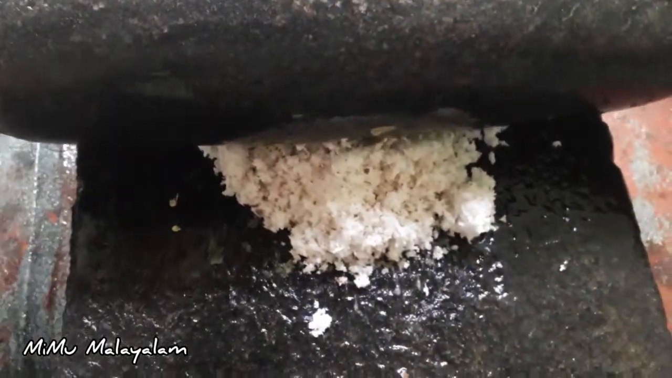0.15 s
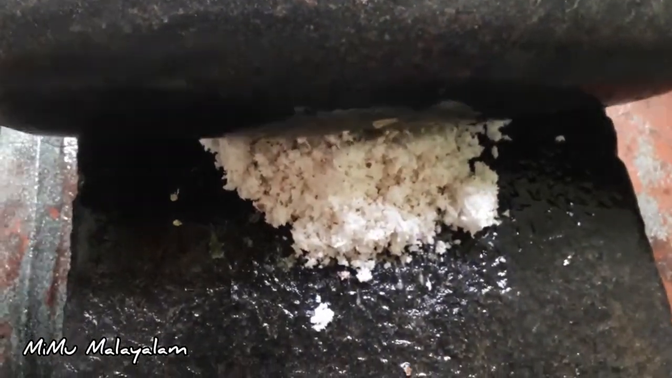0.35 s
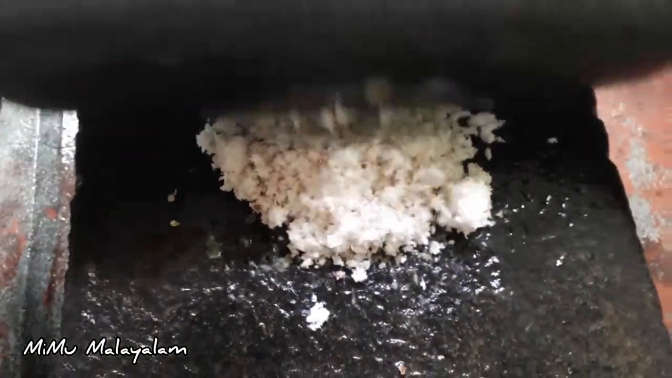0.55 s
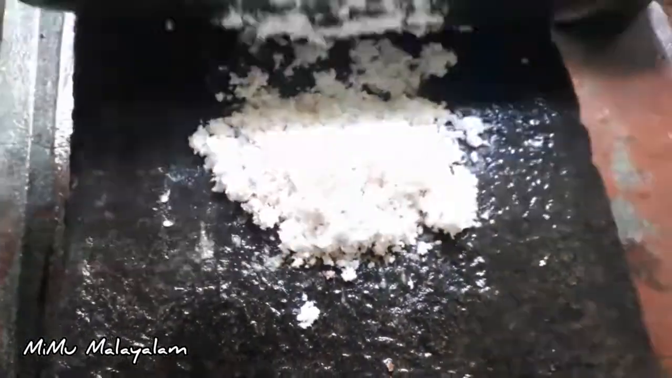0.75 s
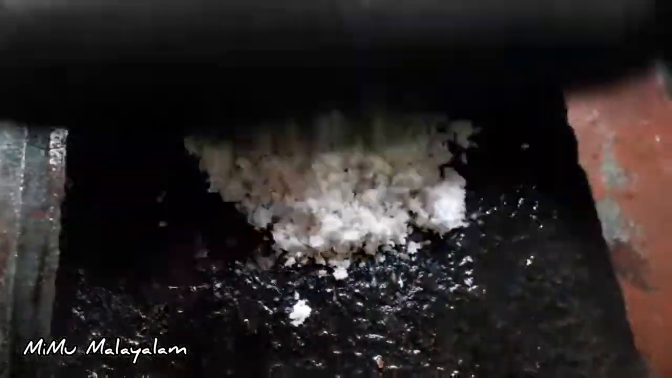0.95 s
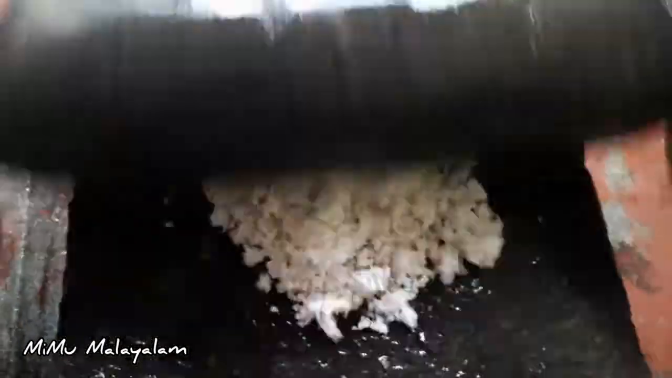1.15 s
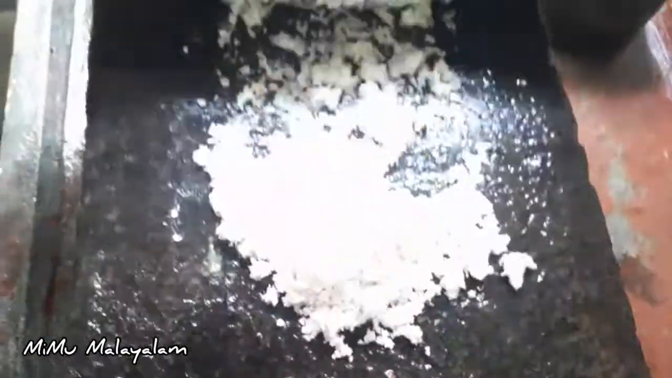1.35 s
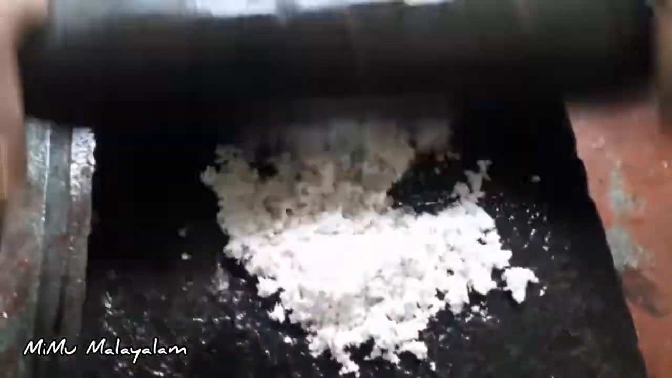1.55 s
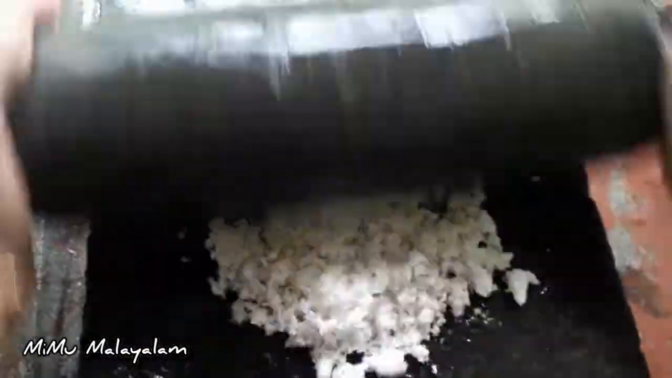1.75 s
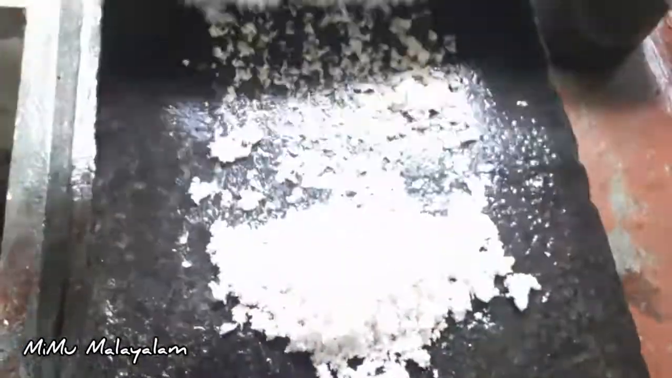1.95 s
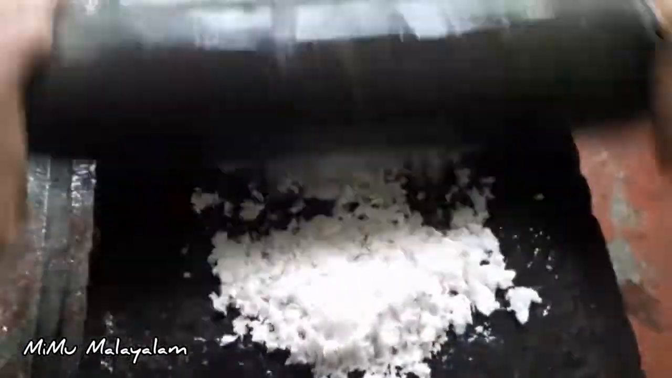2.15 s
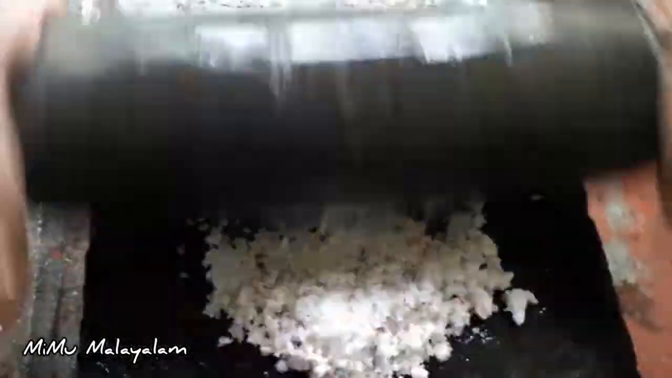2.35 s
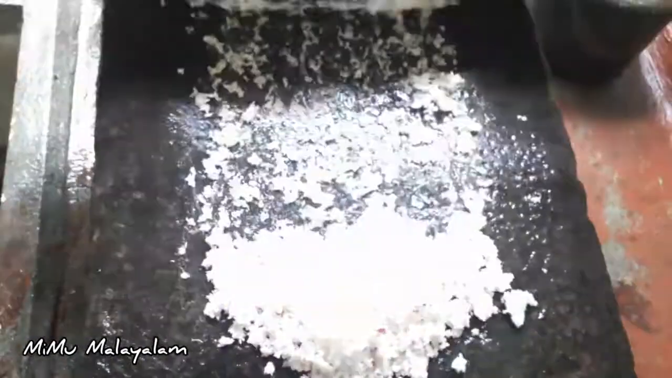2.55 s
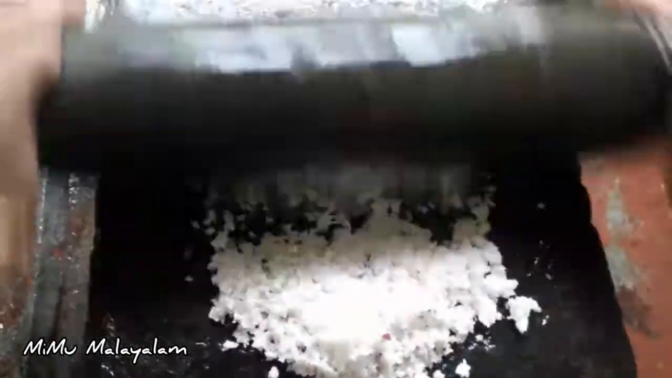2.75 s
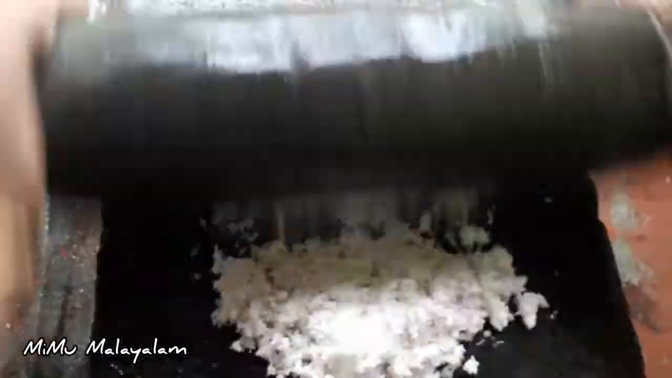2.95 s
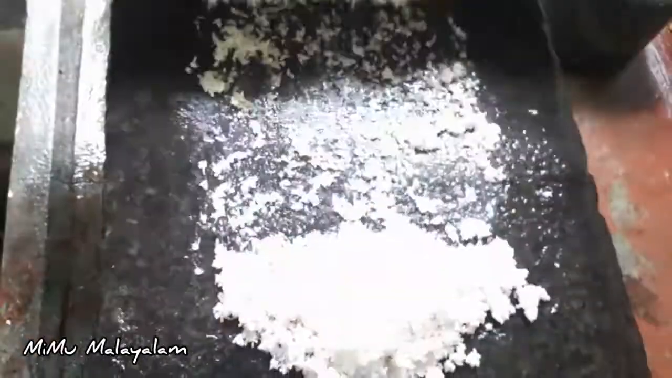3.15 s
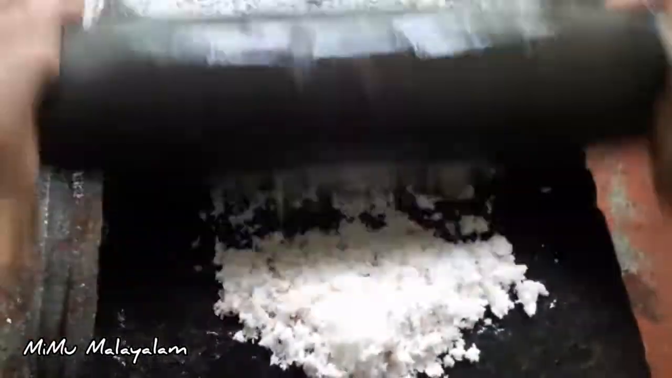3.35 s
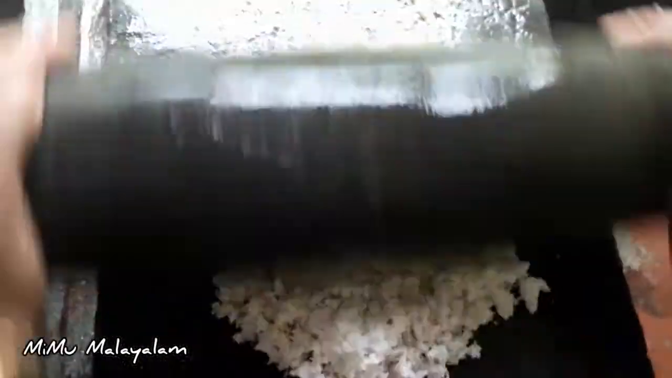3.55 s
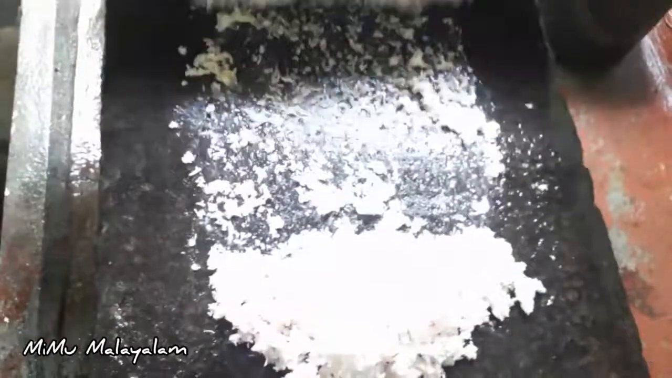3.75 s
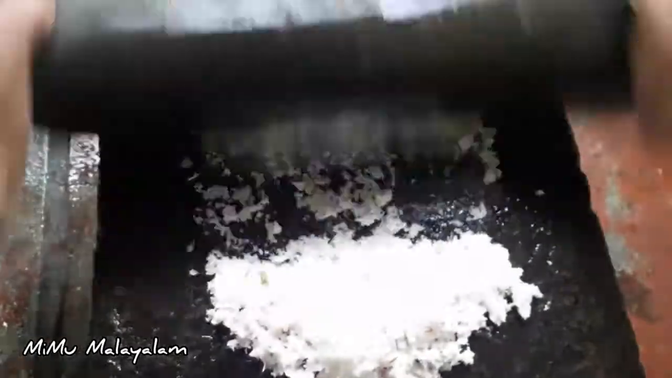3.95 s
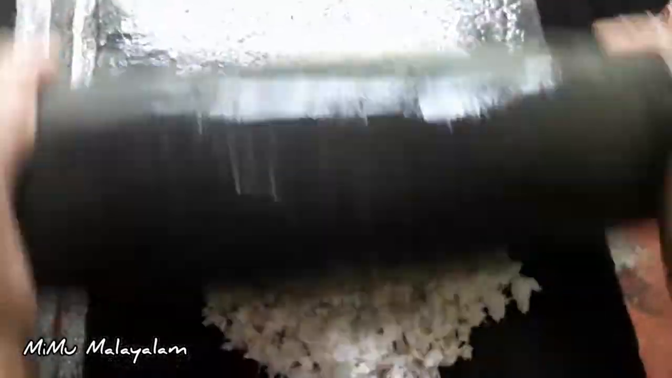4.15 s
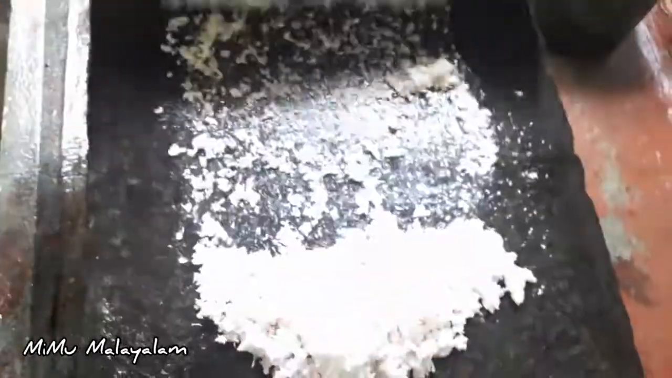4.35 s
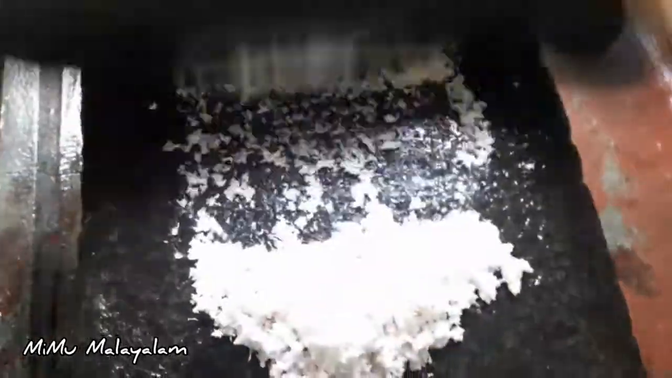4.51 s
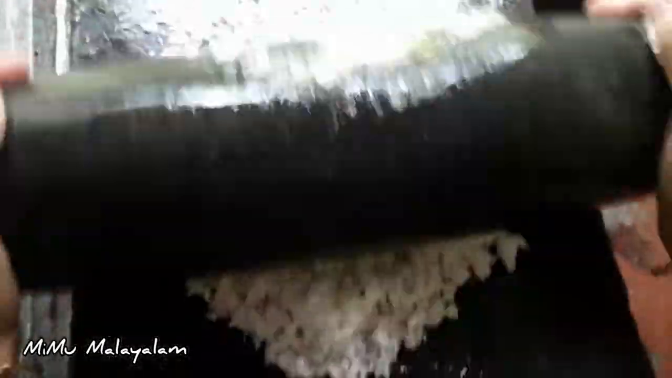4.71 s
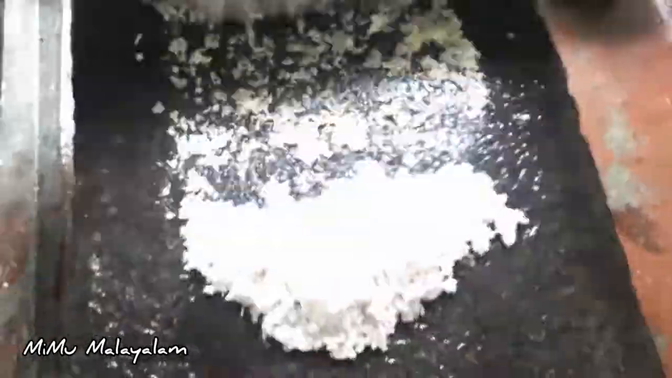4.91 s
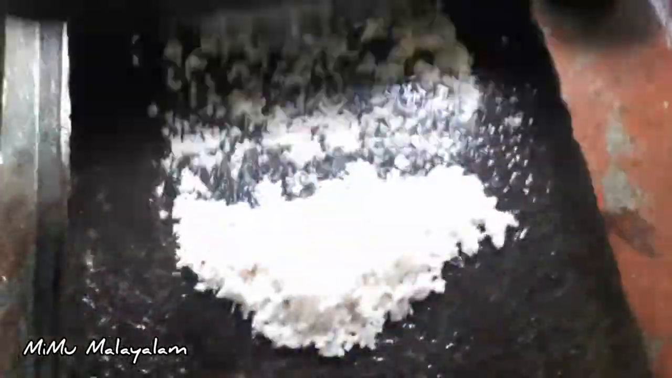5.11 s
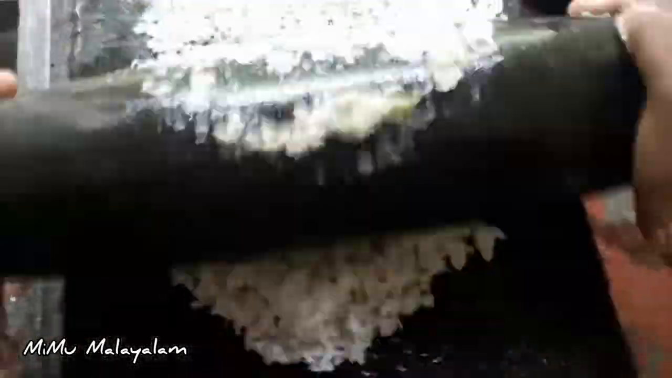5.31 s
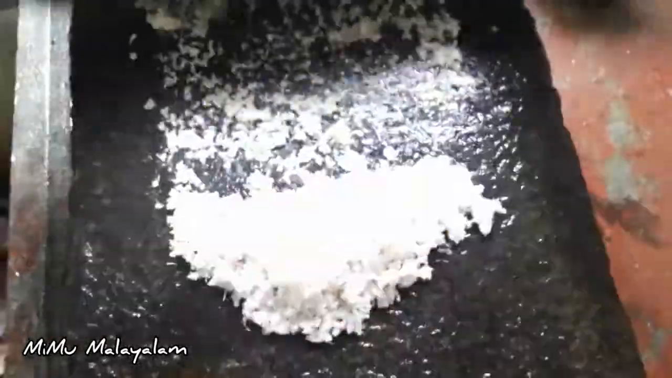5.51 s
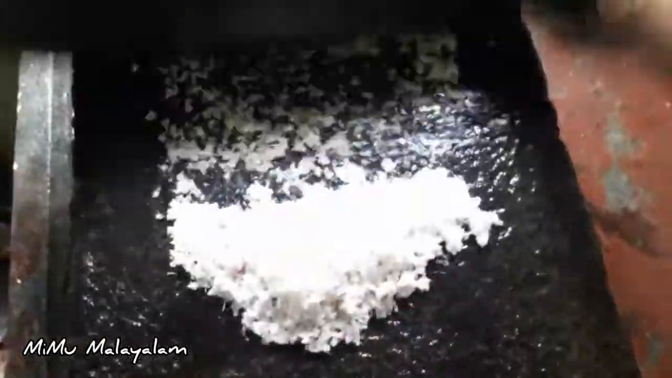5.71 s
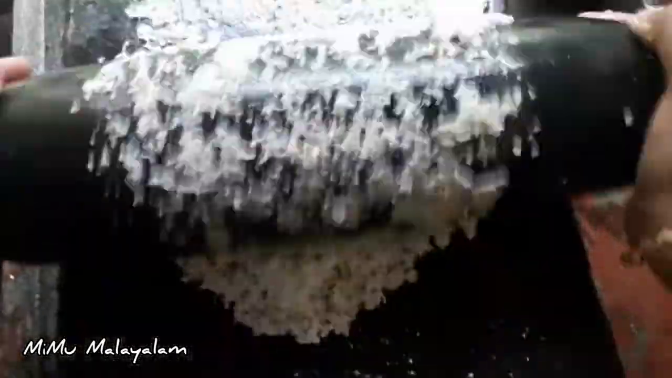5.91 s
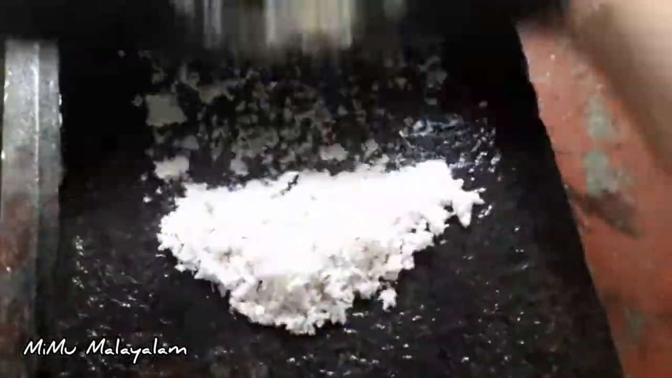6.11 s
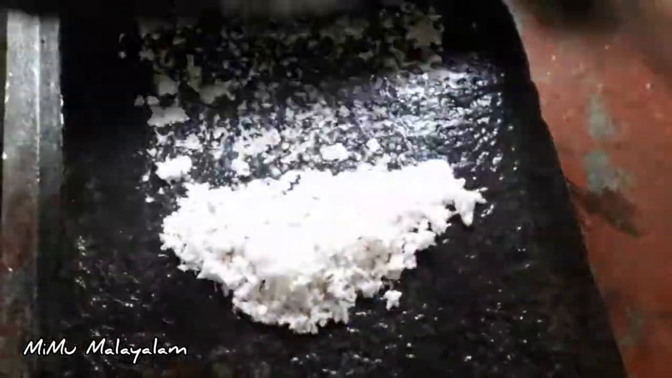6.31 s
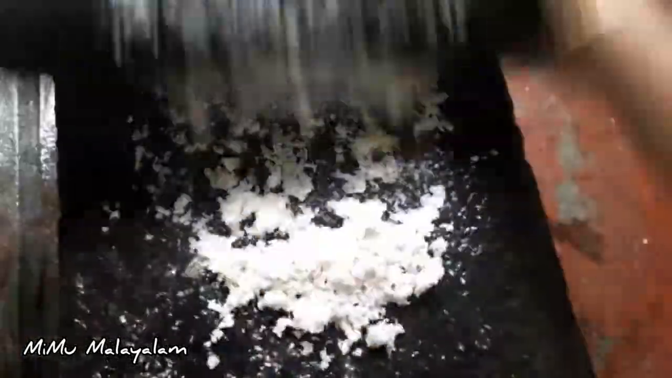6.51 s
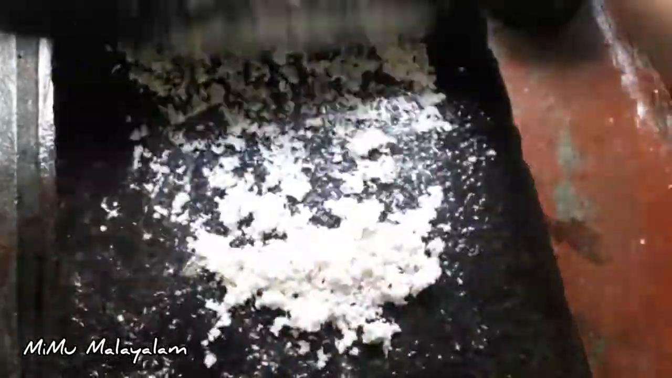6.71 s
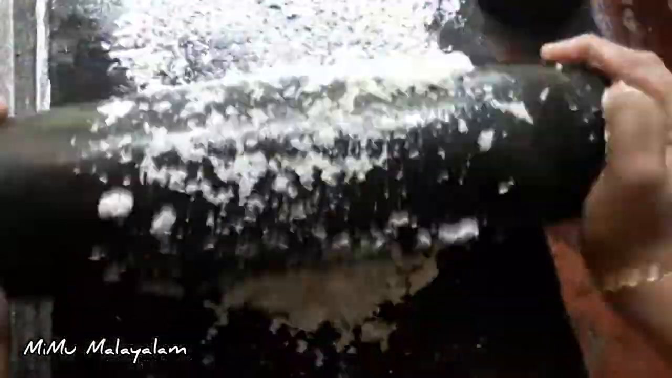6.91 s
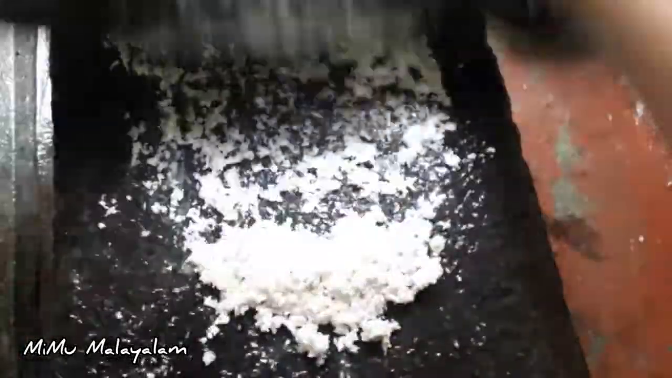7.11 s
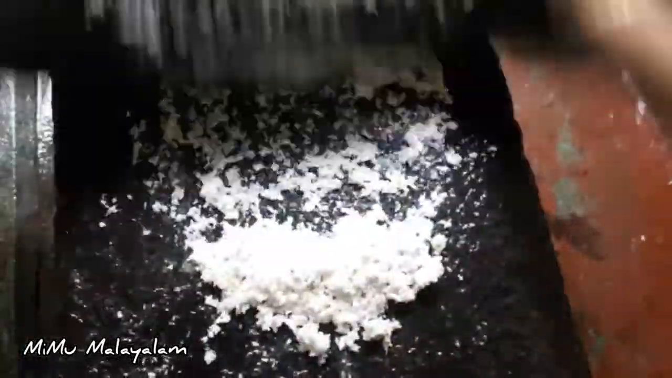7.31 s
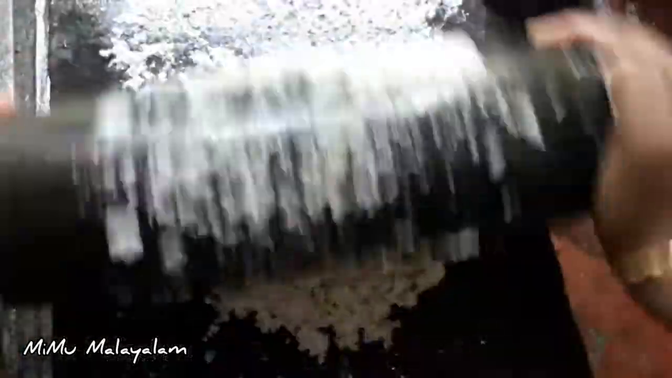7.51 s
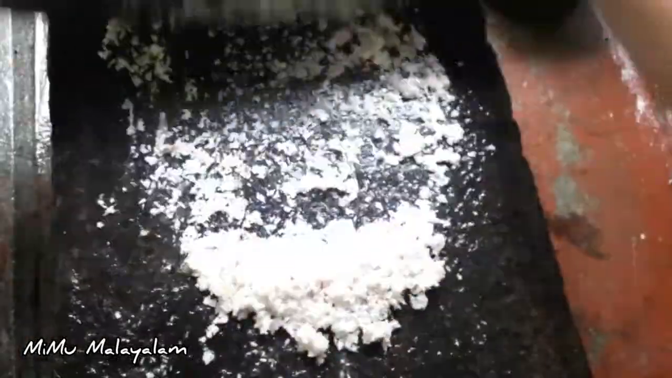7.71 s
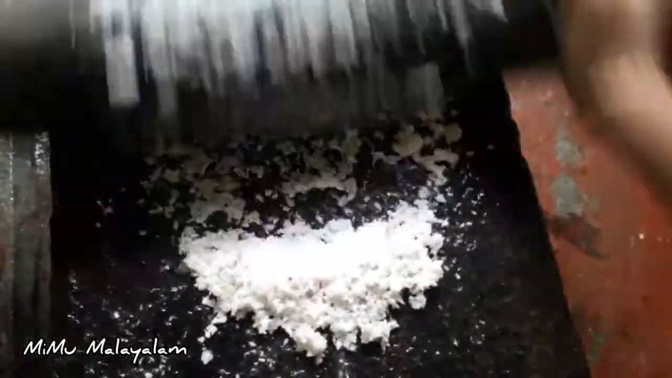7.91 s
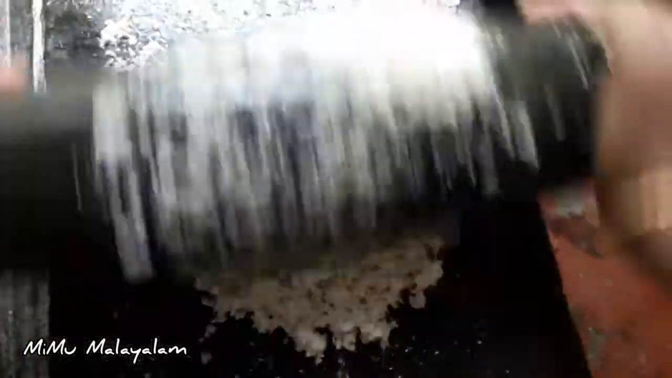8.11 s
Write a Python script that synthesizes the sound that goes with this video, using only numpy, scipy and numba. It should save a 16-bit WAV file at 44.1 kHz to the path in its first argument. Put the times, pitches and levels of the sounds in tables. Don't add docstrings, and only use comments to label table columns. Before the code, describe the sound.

A heavy stone roller grinds wet grated coconut back and forth on a stone slab, crackling and crunching over a low rumble, with occasional hollow knocks.

```python
import sys
import numpy as np
from scipy import signal
from scipy.fft import rfft, irfft, next_fast_len
from scipy.io import wavfile
from scipy.ndimage import uniform_filter1d
from numba import njit

SR = 44100
rng = np.random.default_rng(int(sys.argv[2]) if len(sys.argv) > 2 else 0)


def linear_from_db(decibels):
    return 10 ** (np.asarray(decibels, float) / 20)


def dump_mix(stems):
    frames = np.atleast_2d(stems).T
    limited = np.clip(frames, -1, 1)
    pcm = np.round(limited * 32767).astype(np.int16)
    wavfile.write(sys.argv[1], SR, pcm)


N = 364266

# pitch_hz, level_db (per Hz)
KITCHEN_TONE = [(18, -23), (30, 25.5), (64, -9), (844, -31.5), (2120, -13), (2610, -22), (2900, -26),
                (6210, -45), (8100, -26), (8560, -11), (9300, -22.5), (16000, -41.5)]
KITCHEN_DB = -50.5
# start_s, length_s, level_db, low_hz, high_hz
RUSTLES = [
    (-0.043, 0.12, -63, 500, 2300),
    (-.1, .3, -64, 2800, 4000),
    (0, 0.16, -73, 6400, 7600),
    (.1, 0.068, -65.5, 1500, 2100),
    (.27, 0.2, -64, 4500, 8300),
    (0.48, 0.15, -61, 1420, 2400),
    (.57, 0.18, -62, 3320, 4300),
    (0.682, 0.02, -49, 440, 1900),
    (-0.09, 0.2, -68, 8000, 10400),
]
# start_s, peak_db, pitch_hz
BUMPS = [
    (0.055, -40, 115),
    (0.106, -40, 74),
    (0.14, -32.5, 97),
    (0.174, -48, 111),
]
# time_s, crackle_db, grit_db (fine grit above crackle)
SETTLING = [
    (0, -67, -6),
    (.2, -81, -6),
    (.38, -69, 2),
    (.465, -79, -1),
    (.52, -57.5, -6.5),
    (.64, -52, -1),
    (.71, -54, -11),
    (.795, -61.5, 4),
]
SETTLING_RUMBLE_DB = -69.5
# start_s, turn_db (crackle at the turn),
# full_db (crackle at speed), grit_db (above crackle), rumble_db
PUSHES = [(.81, -69, -42, 2, -55), (1.382, -61.5, -37.5, 1, -51), (1.99, -52.5, -37, 4, -44.5),
          (2.586, -44, -39.5, -0.5, -44), (3.177, -53.5, -39.5, 3, -45.5), (3.785, -50, -40, 3, -42.5),
          (4.389, -49, -44, 3, -44), (5.009, -59, -42.5, 4.5, -41), (5.627, -55, -55, 4, -51),
          (5.688, -49, -45, 6.5, -34), (6.255, -45.5, -52, 2, -41.5), (6.377, -36, -38.5, 2.5, -39.5),
          (6.942, -44.5, -37, 2, -35.5), (7.506, -41, -33.5, -0.5, -35), (8.078, -53, -39, 3.5, -33)]
PULLS = [(1.087, -54, -36.5, -0.5, -43.5), (1.683, -48, -37, 0.5, -42), (2.308, -44.5, -39.5, 4, -39.5),
         (2.922, -34, -40, 4.5, -39.5), (3.494, -41.5, -39.5, 2, -36), (4.1, -45.5, -39.5, 3.5, -34),
         (4.709, -49.5, -36.5, 2.5, -38.5), (5.338, -52.5, -38.5, 5.5, -36), (5.97, -56, -39.5, 3, -35.5),
         (6.658, -50, -36, -1.5, -43), (7.231, -54, -38, 1, -37.5), (7.816, -53, -36.5, 2.5, -37.5)]
LAST_TURN_S = 8.38
FASTEST_PLACE, HEAVIEST_PLACE, CRACKLE_FLATNESS = (0.5, 0.52), (0.55, 0.47), (0.45, 0.45)
TURN_GRIT_DB, TURN_RUMBLE_DB = -7.5, (-16.5, -19.5)
RUMBLE_LAG_S, RUMBLE_FLATNESS = 0.011, 1.15
# pitch_hz, level_db (per Hz)
CRACKLE_TONE = [(700, -91), (1400, -16.5), (2200, 0), (3100, -3.5), (3800, 0.5), (4900, -7.5), (7000, -9),
                (11000, -69.5)]
# pitch_hz, level_db (per Hz)
GRIT_TONE = [(3000, -5.5), (5000, -1), (7000, 0), (8300, -4), (10000, 0.5), (12000, -6), (16000, -12)]
# pitch_hz, width_hz, level_db
ROLLER = [(3750, 82, -19)]
# pitch_hz, width_hz, level_db
RUMBLE = [(89, 17, 1), (138.7, 21, 0), (194, 80, -6.5), (303.4, 55, -4.5), (398.4, 21.6, -3),
          (520, 39, -10.5)]
# start_s, level_db, centre_hz, length_ms
SQUASHES = [(0.482, -60, 2000, 8), (0.507, -49, 1530, 11), (.8475, -42, 3000, 8.8),
            (0.982, -26.5, 2220, 57), (1.041, -30, 2320, 25.5), (1.099, -32, 2220, 66),
            (1.2711, -41, 2940, 11), (1.6892, -28, 2560, 26.5), (2.257, -28, 2490, 35),
            (2.303, -26.5, 2330, 27), (2.818, -26.5, 2280, 12), (2.845, -24, 2490, 27),
            (2.895, -28.5, 2300, 21), (3.453, -18.5, 2500, 17.5), (3.502, -26.5, 2400, 18),
            (4.0495, -25.5, 2270, 28), (4.103, -27, 2320, 26), (4.548, -20, 3580, 5.1),
            (4.559, -27, 5500, 20), (5.779, -43, 2180, 27), (5.4723, -24, 3550, 18), (5.9, -32.5, 2100, 14),
            (5.916, -24, 3050, 9.2), (5.923, -18.5, 1980, 6.3), (5.932, -29.5, 2850, 27),
            (5.983, -24.5, 2540, 21), (6.067, -28, 5100, 5.5), (6.175, -26, 5330, 4.8),
            (6.394, -21, 3250, 10), (6.8675, -27.5, 4430, 32), (6.898, -36, 2030, 32),
            (6.9555, -24, 2550, 12), (7.354, -20.5, 5040, 9.1), (7.521, -28, 2650, 12),
            (8.086, -35, 2680, 18), (8.225, -25, 4310, 19)]
# start_s, level_db, rise_ms, length_ms
CRACKS = [(1.2186, -30, 3.4, 7.7), (1.524, -24.5, 9.8, 21), (1.785, -22, 2.8, 4.4), (1.832, -23.5, 3.3, 39),
          (1.8867, -41, 2, 5.4), (1.935, -29, 6.4, 19.7), (2.154, -23.5, 8.4, 18), (2.4227, -25.5, 1.9, 22),
          (2.627, -30, 4.9, 14), (2.737, -25, 3.7, 8.5), (2.757, -20, 3.6, 6.1), (3.02, -25.5, 4.7, 24),
          (3.335, -26, 6.5, 35), (3.635, -26.5, 2.2, 16), (3.719, -29, 6.1, 7.6), (3.95, -21, 2.5, 11),
          (4.197, -18, 2.9, 3.1), (4.2483, -31, 2.5, 15), (5.15, -30, 1.9, 9.8), (5.499, -27.5, 1.9, 8),
          (5.6473, -43, 4, 11), (5.7813, -37, 7.2, 9.2), (6.0333, -29, 2.9, 6.9), (6.541, -17.5, 1.2, 4.9),
          (6.6757, -32.5, 2.3, 3.7), (6.77, -29.5, 6.5, 29), (7.148, -31, 4.4, 14), (7.244, -30, 18, 12.3),
          (7.795, -33, 4.7, 15)]
# start_s, level_db, centre_hz, length_ms
SNAPS = [(0.8326, -31.5, 8630, 3.3), (.824, -43, 4500, 3), (.896, -29, 5740, 14), (1.153, -25.5, 4700, 6.2),
         (1.253, -29, 8300, 8.6), (2.441, -22, 2980, 6), (2.463, -20.5, 5640, 3.1), (2.512, -24, 8200, 4.9),
         (3.3997, -27.5, 6840, 17), (3.42, -33.5, 2370, 14), (3.5695, -25.5, 4870, 12),
         (4.018, -20, 5900, 9.6), (4.317, -29.5, 6500, 5.6), (4.351, -31, 4500, 4.5),
         (4.454, -33.5, 4500, 3.8), (4.466, -35, 3500, 3.3), (4.622, -21.5, 2420, 4.3),
         (4.651, -26.5, 8000, 4), (4.848, -28, 4500, 15), (4.6826, -30.5, 7700, 6.4),
         (4.74, -34, 6060, 9.1), (4.833, -26, 7100, 2.1), (5.221, -23.5, 7700, 7.7),
         (5.8495, -28.5, 9100, 9), (5.8714, -30, 7000, 6.4), (5.901, -37, 6000, 4.4),
         (6.137, -33, 7540, 5.1), (6.575, -29.5, 6900, 5.8), (7.1023, -24.5, 6100, 8.7),
         (7.246, -30, 9150, 9.9), (7.36, -26, 8800, 10), (5.652, -32.5, 10000, 7.2), (7.414, -23, 5500, 19),
         (7.648, -21, 5740, 3.5), (7.684, -21, 7190, 8.4), (7.919, -26, 7110, 7.9)]
CRACK_HZ = 4000
SQUASH_RISE, SNAP_RISE = 0.35, 0.45
SQUASH_OCTAVES, SNAP_OCTAVES = 0.27, 0.2
SQUASH_DULL_DB, CRACK_DULL_DB, SNAP_DULL_DB = -19, -23, -42
# start_s, peak_db, far_share (0-1), clack_db (above the ring), clack_hz, deep_db
KNOCKS = [(0.698, -5, 0.26, -12, 2170, -4.5), (0.7033, -12, 0.14, -2, 2120, -1.5),
          (5.2898, -9.5, 0.72, 4, 968, 4), (5.753, -32.5, 0.26, -21, 800, 2), (5.8, -29, 0.32, -25, 800, 1),
          (5.833, -18, 0.07, -20, 800, -0.5), (6.1, -22.5, 0.26, 10.5, 302, 3),
          (6.118, -17.5, 0.16, -23, 940, -1), (6.2085, -12.5, 0.04, -1, 410, -10.5),
          (7.734, -19.5, 0.14, -30.5, 800, -2), (7.751, -18.5, 0.19, -26, 790, -7),
          (7.8323, -12.5, 0.39, 9.5, 484, -5), (7.850, -20, 0.15, -36, 895, 4),
          (8.183, -18, 0.16, -31, 872, -1), (8.2034, -12.5, 0.42, -1.5, 330, 0.3),
          (8.225, -27, 0.6, -19, 895, 3)]
# pitch_hz, level_db, t60_s (time to fall 60 dB)
SLAB_NEAR = [(138, -12, 0.26), (249, -9.5, 0.094), (294.3, -4, 0.13), (404, 5.5, 0.083), (521, -14, 0.11),
             (751, -32, 0.16), (882, -27, 0.093), (1015, -27, 0.14), (1247, -38.5, 0.16),
             (1550, -41, 0.063)]
# pitch_hz, level_db, t60_s
SLAB_FAR = [(124, -17.5, 0.65), (309.8, 1.5, 0.16), (403, 12.5, 0.058), (522.6, -0.5, 0.13),
            (654, -12.5, 0.093), (764, -30, 0.059), (942, -22, 0.12), (992, -26, 0.077), (1108, -25, 0.045),
            (1303, -41, 0.1), (1546, -31, 0.064), (1900, -31, 0.3)]
# pitch_hz, level_db, t60_s
WORKTOP = [(119, -13, 0.1), (200, -7, 0.068)]
# low_hz, high_hz, level_db (above the ring), t60_s
THUD = [(99, 470, -16.5, 0.37), (594, 1140, -5.5, 0.082), (1300, 1800, -14, 0.08)]
DEEP_HZ = 350
# start_s, level_db, t60_s, length_s
LIFTED_RING = (6.243, -31, 0.3, 0.053)
# start_s, length_s, level_db, pitch_hz
HUMS = [(5.746, .07, -42, 370), (6.048, 0.044, -38.5, 404), (6.254, 0.051, -33, 404),
        (7.6, 0.052, -36, 404), (7.803, 0.054, -29, 404), (8.115, 0.086, -37, 404),
        (6.095, 0.045, -42, 2190), (6.19, 0.045, -44, 2200), (7.735, 0.049, -42, 3750),
        (5.3, 0.015, -42.5, 2080), (0.705, 0.025, -48, 3750)]
# start_s, peak_db, pitch_hz
TICKS = [(0.832, -32, 10800), (0.8993, -27, 3220), (0.8992, -12.5, 6970), (0.989, -22, 4680),
         (0.9912, -16, 2400), (1.1006, -25, 2470), (1.1041, -21, 2530), (1.153, -28, 5980),
         (1.182, -22, 3900), (1.2014, -18, 4220), (1.2192, -16, 4200), (1.257, -12, 8450),
         (1.276, -18, 4650), (1.482, -18, 3830), (1.5343, -17.5, 2870), (1.5335, -12, 3780),
         (1.6967, -13.5, 2860), (1.7806, -19, 4100), (1.786, -15, 4070), (1.806, -10.5, 4060),
         (1.9394, -15.5, 4940), (2.147, -13, 3860), (2.1583, -14, 3700), (2.261, -23, 2770),
         (2.268, -18, 2310), (2.3069, -20.5, 4440), (2.3069, -24, 3000), (2.4226, -9, 4060),
         (2.464, -16, 3770), (2.6307, -18, 4400), (2.7374, -9, 3860), (2.758, -10.5, 4440),
         (2.8204, -22, 2230), (2.8505, -12, 2530), (2.9514, -26, 2490), (2.9968, -21, 3680),
         (3.0126, -14.5, 4040), (3.1999, -23, 4490), (3.2134, -18, 4140), (3.3356, -17, 3900),
         (3.3563, -8, 3740), (3.4014, -21.5, 6860), (3.4207, -18, 2400), (3.4578, -22, 2400),
         (3.4578, -10, 3970), (3.5042, -16, 3500), (3.5705, -15, 5280), (3.6249, -16, 6760),
         (3.7077, -20, 10100), (3.7227, -13.5, 4400), (3.9522, -10.5, 3900), (4.023, -3.5, 5730),
         (4.048, -17, 2250), (4.0599, -11, 3900), (4.1028, -17, 3150), (4.11, -22, 2120),
         (4.1976, -24, 4000), (4.241, -18, 3610), (4.2495, -16, 3510), (4.2814, -24, 5070)]
# start_s, peak_db, pitch_hz
LATE_TICKS = [(4.4053, -25, 5700), (4.55, -19, 4290), (4.6128, -21, 4360), (4.6232, -20, 2520),
              (4.6832, -19, 7460), (4.7381, -29, 3740), (4.743, -21, 3540), (4.744, -17, 6000),
              (4.8309, -15, 7160), (5.1516, -17, 3700), (5.222, -16, 6400), (5.3761, -24, 6500),
              (5.4145, -16, 6860), (5.4619, -25, 4100), (5.474, -9, 4020), (5.649, -24, 4230),
              (5.7864, -16, 10100), (5.8515, -15, 9350), (5.872, -13.5, 6930), (5.901, -24, 3750),
              (5.9259, -21, 5950), (5.9268, -7, 2100), (5.987, -16, 2100), (6.0346, -21, 3940),
              (6.071, -22, 4760), (6.1379, -18, 7400), (6.177, -17, 5860), (6.3964, -16, 3870),
              (6.5425, -11, 3800), (6.5759, -13, 6830), (6.6767, -28, 4750), (6.677, -24, 3900),
              (6.6991, -18, 6810), (6.7724, -29, 3660), (6.773, -25, 3560), (6.955, -17, 4000),
              (6.957, -16, 3880), (7.0473, -27, 5750), (7.109, -13.5, 6840), (7.1506, -18, 4000),
              (7.2383, -17, 8900), (7.246, -24, 2800), (7.2478, -22, 9750), (7.3566, -14, 2240),
              (7.415, -13, 5930), (7.5207, -21, 4260), (7.5262, -18, 2460), (7.5885, -13, 6430),
              (7.5881, -18, 4600), (7.637, -13.5, 3270), (7.6489, -14, 5880), (7.7986, -30, 4310),
              (7.8, -16, 4100), (7.8769, -20, 4000), (7.9, -14.5, 4540), (7.92, -22, 2850),
              (8.0979, -33, 2220), (8.0979, -20.5, 2390), (8.1378, -26, 6750), (8.2268, -21, 2180)]
TICK_DB, TICK_MS, TICK_RING_DB, TICK_CYCLES = -5.5, 0.93, 0.5, 6.7
# start_s, end_s
DROPOUT = (6.386, 6.396)
MIC_LOW_HZ, MIC_HIGH_HZ = 68, 15850


def unit(x):
    return x / np.sqrt(np.mean(x ** 2))


def colour(x, points):
    hz, db = np.transpose(points)
    size = next_fast_len(len(x))
    bins = np.fft.rfftfreq(size, 1 / SR) + 1
    gain = linear_from_db(np.interp(np.log(bins), np.log(hz), db))
    return irfft(rfft(x, size) * gain, size)[:len(x)]


def band(x, lo_hz, hi_hz, order=2):
    return signal.sosfilt(signal.butter(order, [lo_hz, hi_hz], "bandpass", fs=SR, output="sos"), x)


def walk(rate):
    hold = max(int(SR / rate), 2)
    steps = np.repeat(rng.standard_normal(N // hold + 1), hold)
    return 2.0 * uniform_filter1d(steps, hold)[:N]


def resonate(x, peaks):
    out = 0
    for hz, width, db in peaks:
        out = out + linear_from_db(db + 1.2 * walk(7)) * unit(band(x, hz - width / 2, hz + width / 2, order=1))
    return out


def add(out, s, x):
    i = int(s * SR)
    out[i:i + len(x)] += x[:len(out) - i]


def swell_at(s, length_s):
    return np.sin(np.pi * np.clip((np.arange(N) / SR - s) / length_s, 0, 1))


@njit
def grains(n, start, turn, fade, size):
    out = np.zeros(n + 1024)
    for g in range(len(start)):
        z, p = size[g] + 0j, fade[g] * np.exp(1j * turn[g])
        for i in range(min(int(-5 / np.log(fade[g])), 1000)):
            z *= p
            out[start[g] + i] += z.imag
    return out[:n]


def crackle(lo_hz, hi_hz, cycles, scatter_db, count):
    when, place, luck = rng.random((count, 3)).T
    hz = lo_hz + (hi_hz - lo_hz) * place
    size = linear_from_db(-scatter_db * np.log(1 - .998 * luck)) * np.sqrt(hz / lo_hz)
    fade = np.exp(-hz / (cycles * SR))
    return unit(grains(N, (when * N).astype(np.int64), 2 * np.pi * hz / SR, fade, size))


def kitchen():
    return linear_from_db(KITCHEN_DB + 1.0 * walk(4.0)) * unit(colour(rng.standard_normal(N), KITCHEN_TONE))


def rustles():
    rub = rng.standard_normal(SR)
    patches = np.zeros(SR)
    for s, length_s, db, lo_hz, hi_hz in RUSTLES:
        patches += linear_from_db(db) * swell_at(s, length_s)[:SR] * unit(band(rub, lo_hz, hi_hz))
    return np.pad(patches, (0, N - SR))


def bumps():
    out, t = np.zeros(N), np.arange(6000) / SR
    for s, db, hz in BUMPS:
        add(out, s, linear_from_db(db + 15.5) * np.sin(2 * np.pi * hz * t) * (t / 0.0068) * np.exp(-t / 0.0041))
    return out


def strokes():
    t = np.arange(N) / SR
    rows = np.array(sorted([(*r, 0) for r in PUSHES] + [(*r, 1) for r in PULLS]))
    turns = np.append(rows[:, 0], LAST_TURN_S)
    turn_db = np.append(rows[:, 1], rows[-1, 1])

    def swell(t, top_place):
        k = np.clip(np.searchsorted(turns, t) - 1, 0, len(rows) - 1)
        way = rows[k, -1].astype(int)
        done = np.clip((t - turns[k]) / np.diff(turns)[k], 0, 1)
        bend = np.log(.5) / np.log(top_place)[way]
        return rows[k].T, way, np.abs(np.sin(np.pi * done ** bend))

    (_, _, full_db, grit_db, _, _), way, speed = swell(t, FASTEST_PLACE)
    drive = speed ** np.array(CRACKLE_FLATNESS)[way]
    crackle_db = (1 - drive) * (np.interp(t, turns, turn_db) - 5.0) + drive * (full_db - 0.8)
    grit_db = grit_db + (1 - drive) * TURN_GRIT_DB
    (*_, deep_db, _), way, load = swell(t - RUMBLE_LAG_S, HEAVIEST_PLACE)
    rumble_db = deep_db + (1 - load ** RUMBLE_FLATNESS) * np.array(TURN_RUMBLE_DB)[way]
    early = t < turns[0]
    when, hand_db, dust_db = np.transpose(SETTLING)
    controls = (np.where(early, np.interp(t, when, hand_db), crackle_db),
                np.where(early, np.interp(t, when, dust_db), grit_db),
                np.where(early, SETTLING_RUMBLE_DB, rumble_db))
    return [uniform_filter1d(c, size=400) for c in controls]


def scraping(crackle_db, grit_db, rumble_db):
    slip = .4 * walk(30) + 1.3 * walk(120)
    coarse = unit(colour(crackle(1237, 8876, cycles=7.0, scatter_db=1.5, count=80000), CRACKLE_TONE))
    coarse = unit(coarse + resonate(coarse, ROLLER))
    big = band(coarse, 500, 3100)
    coarse = linear_from_db(1.34 * walk(14)) * big + coarse - big
    fine = unit(colour(crackle(3940, 18440, cycles=3.6, scatter_db=1.0, count=70000), GRIT_TONE))
    squelch = unit(band(crackle(580, 2040, cycles=3.8, scatter_db=1.5, count=12000), 815, 1100))
    squelch_db = crackle_db + 37 + 0.22 * (rumble_db + 42.0) - 57.5
    return (linear_from_db(crackle_db + slip + 1.0 * walk(45)) * coarse
            + linear_from_db(crackle_db + grit_db + slip + 1.32 * walk(40)) * fine
            + linear_from_db(squelch_db + 1.24 * walk(12)) * squelch)


def stroke_power(x):
    return uniform_filter1d(uniform_filter1d(x ** 2, size=5000), size=5000) + 1e-18


def rumble(db):
    lumps = linear_from_db(db + 1.2 * walk(20)) * crackle(60, 700, cycles=.6, scatter_db=1.5, count=8000)
    body = band(resonate(lumps, RUMBLE), 78.6, 456, order=3)
    return linear_from_db(-0.33) * body * np.sqrt(stroke_power(linear_from_db(db)) / stroke_power(body))


def splits(crackle_db):
    when, luck = rng.random((700, 2)).T
    kicks = np.zeros(N)
    kicks[(when * N).astype(int)] = linear_from_db(-4.5 * np.log(1 - .99 * luck))
    burst = signal.lfilter([1], [1, -np.exp(-1 / (0.003 * SR))], kicks)
    return linear_from_db(crackle_db - 9.0) * unit(burst * band(rng.standard_normal(N), 2500, 15500, order=1))


def crunch_rows():
    return ([(s, db, hz, SQUASH_OCTAVES, SQUASH_RISE * ms, ms, SQUASH_DULL_DB) for s, db, hz, ms in SQUASHES]
            + [(s, db, CRACK_HZ, SNAP_OCTAVES, rise, ms, CRACK_DULL_DB) for s, db, rise, ms in CRACKS]
            + [(s, db, hz, SNAP_OCTAVES, SNAP_RISE * ms, ms, SNAP_DULL_DB) for s, db, hz, ms in SNAPS])


def crunches():
    out, ms = np.zeros(N), np.arange(4000) / SR * 1000
    breaks = crackle(801, 17700, cycles=4.2, scatter_db=2.0, count=120000)
    hiss = unit(band(breaks, 3000, 5100, order=1))
    dull = unit(band(breaks, 890, 1310))
    for s, db, hz, octaves, rise_ms, length_ms, dull_db in crunch_rows():
        span = slice(int(s * SR) - len(ms), int(s * SR))
        tone = 0.89 * unit(band(breaks[span], hz * 0.89, hz * 2 ** octaves, order=1))
        tone = tone + 0.43 * hiss[span] + linear_from_db(dull_db) * dull[span]
        onset = min(0.043 + length_ms / 40, .85)
        swell = onset + (1 - onset) * np.clip(ms / max(rise_ms, .5), 0, 1) ** 2
        sag = np.exp(-.6 * np.clip(ms - rise_ms, 0, None) / max(length_ms - rise_ms, 1))
        stop = np.exp(-np.clip(ms - length_ms, 0, None) / 1.0)
        snap = 1 + 0.15 * np.exp(-np.abs(ms - rise_ms) / 0.09)
        shape = np.clip(ms, 0, 1) * swell * sag * stop * snap
        strength = np.sqrt(np.sum(shape ** 2) / np.sum((tone * shape) ** 2))
        add(out, s, linear_from_db(db - 3.5) * strength * tone * shape)
    return out


def struck(modes, t, longest_s=0.17):
    out = np.zeros(len(t))
    for k, (hz, db, t60) in enumerate(modes):
        build = 1 - np.exp(-t * hz / 0.69)
        decay = np.exp(-np.log(1000) * t / min(t60, longest_s))
        out += (-1) ** k * linear_from_db(db) * np.sin(2 * np.pi * hz * t) * build * decay
    return out


def deep_and_upper(modes, t):
    deep = [(hz, db if hz < DEEP_HZ else db - 99, t60) for hz, db, t60 in modes]
    upper = [(hz, db - 99 if hz < DEEP_HZ else db, t60) for hz, db, t60 in modes]
    return struck(deep, t), struck(upper, t)


def knocks():
    out, t = np.zeros(N), np.arange(20000) / SR
    near_deep, near_upper = deep_and_upper(SLAB_NEAR, t)
    far_deep, far_upper = deep_and_upper(SLAB_FAR, t)
    worktop = struck(WORKTOP, t)
    for s, db, share, clack_db, clack_hz, deep_db in KNOCKS:
        near = linear_from_db(deep_db) * near_deep + near_upper
        far = linear_from_db(deep_db) * far_deep + far_upper
        ring = (1 - share) * near + share * far + linear_from_db(0.57 * clack_db + deep_db) * worktop
        chips = unit(band(rng.standard_normal(len(t)), clack_hz / 2, clack_hz * 2))
        clack = np.sin(2 * np.pi * clack_hz * t) + 0.035 * chips
        clack = clack * np.minimum(t / 0.0012, 1) * np.exp(-t / 0.0033)
        hard = np.log2(clack_hz / 1000)
        thud_levels = (0.22 * clack_db - 1.5, clack_db - 9.5 + 8.1 * hard, clack_db - 33.5 + 33 * hard)
        thud = np.zeros(len(t))
        for (lo, hi, band_db, t60), blow_db in zip(THUD, thud_levels):
            noise = unit(band(rng.standard_normal(len(t)), lo, hi, order=3))
            thud += linear_from_db(band_db + blow_db) * noise * np.exp(-np.log(1000) * t / t60)
        thud *= np.minimum(t / 0.0014, 1)
        click = unit(band(rng.standard_normal(len(t)), 2100, 11000)) * np.exp(-t / 0.0029)
        click = linear_from_db(clack_db - 27 + 8.6 * hard) * click
        add(out, s, linear_from_db(db) * (ring / np.abs(ring).max() + linear_from_db(clack_db) * clack + thud + click))
    return out + lifted_ring()


def lifted_ring():
    out, t = np.zeros(N), np.arange(20000) / SR
    s, db, t60, length_s = LIFTED_RING
    ring = struck([(ROLLER[0][0], db, t60)], t) * np.minimum(t / 0.017, 1)
    palm = np.clip((length_s - t) / 0.009, 0, 1)
    add(out, s, ring * linear_from_db(2.0 * walk(130)[:len(t)]) * palm)
    return out


def hums():
    t = np.arange(N) / SR
    out = np.zeros(N)
    for s, length_s, db, hz in HUMS:
        out += linear_from_db(db) * swell_at(s, length_s) ** 0.8 * np.sin(2 * np.pi * hz * t)
    return out


def ticks():
    out, t = np.zeros(N), np.arange(600) / SR
    rows = list(TICKS) + list(LATE_TICKS)
    cracks = band(rng.standard_normal((len(rows), len(t))), 2540, 13000)
    for (s, db, hz), crack in zip(rows, cracks):
        ring = linear_from_db(TICK_RING_DB) * np.sin(2 * np.pi * hz * t) * np.exp(-t * hz / TICK_CYCLES)
        tick = (crack * np.exp(-t * 1000 / TICK_MS) + ring) * np.minimum(t / 0.00076, 1)
        add(out, s, linear_from_db(db + TICK_DB) * tick / np.abs(tick).max())
    return out


def scene():
    crackle_db, grit_db, rumble_db = strokes()
    near = scraping(crackle_db, grit_db, rumble_db) + rumble(rumble_db)
    near = near + crunches() + knocks() + hums() + ticks()
    t = np.arange(12000) / SR
    walls = rng.standard_normal(len(t)) * np.exp(-np.log(1000) * t / 0.14) * (t > .003)
    walls = walls / np.sqrt(np.sum(walls ** 2))
    wet = signal.fftconvolve(band(near, 510, 15000, order=1), walls)[:N]
    return (near + linear_from_db(-11.5) * wet + kitchen() + rustles() + bumps() + splits(crackle_db))[None]


def low_pass(x):
    return signal.sosfilt(signal.butter(12, 16850, fs=SR, output="sos"), x)


def record(dry):
    t = np.arange(N) / SR
    heard = signal.sosfilt(signal.butter(4, MIC_LOW_HZ, "highpass", fs=SR, output="sos"), dry)
    heard = signal.sosfilt(signal.ellip(12, .3, 75, MIC_HIGH_HZ, fs=SR, output="sos"), heard)
    heard = .9 * np.tanh(heard / .9)
    gate = np.clip(np.maximum(DROPOUT[0] - t, t - DROPOUT[1]) / 0.00013, 0, 1)
    return low_pass(heard * gate)


dry = scene()
out = record(dry)
dump_mix(out)
```